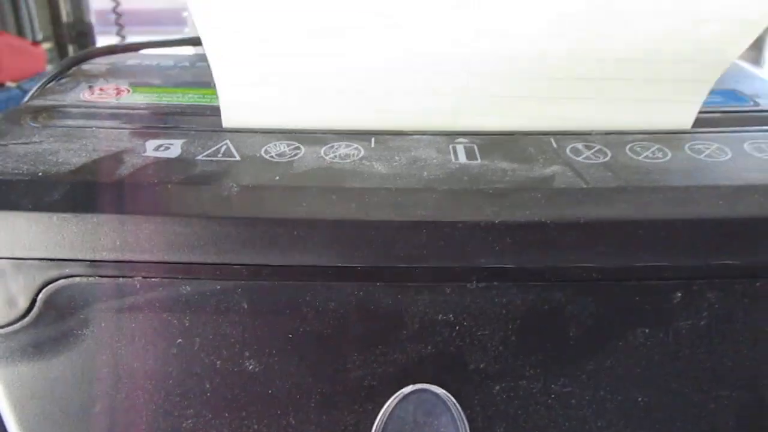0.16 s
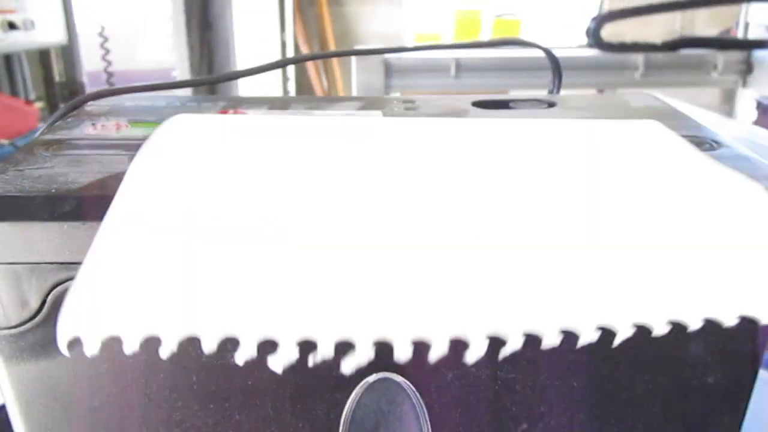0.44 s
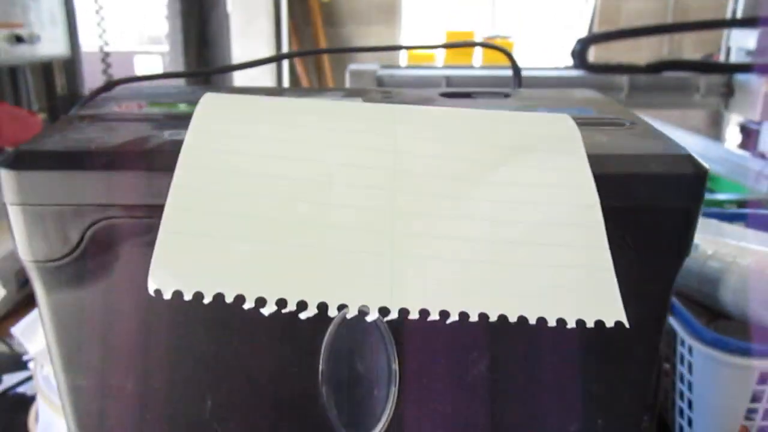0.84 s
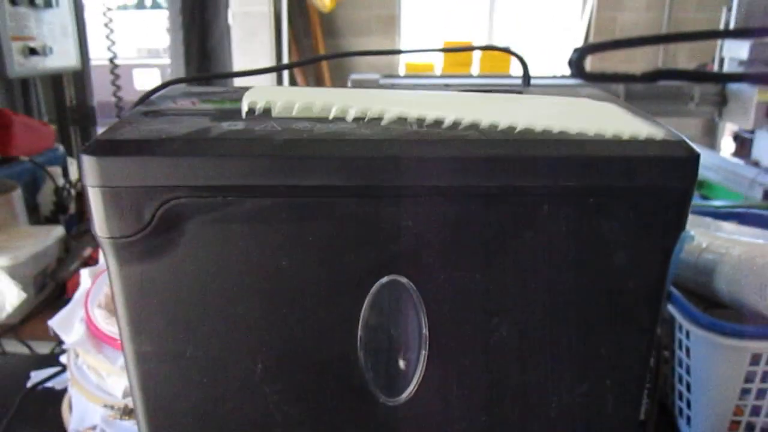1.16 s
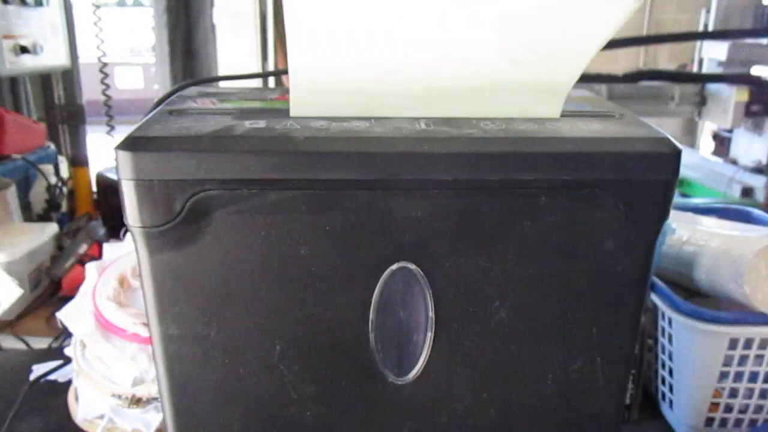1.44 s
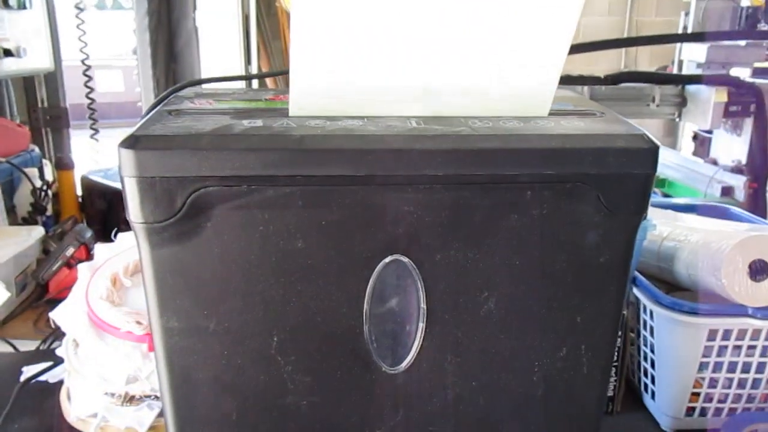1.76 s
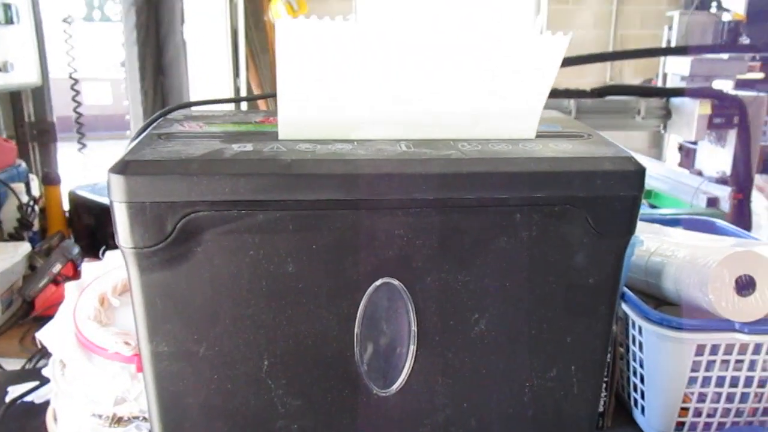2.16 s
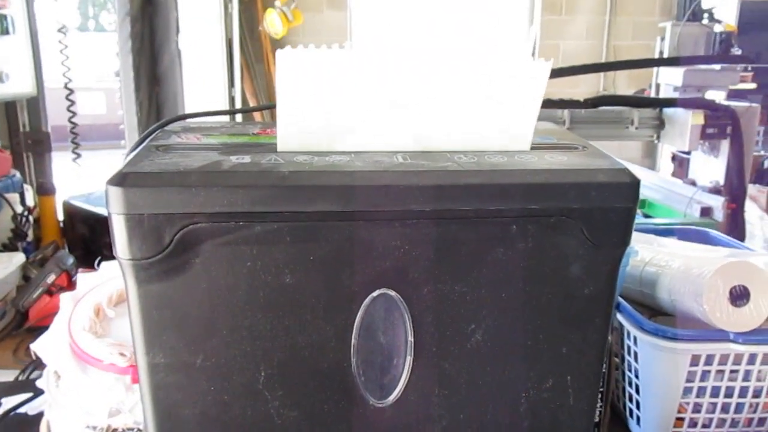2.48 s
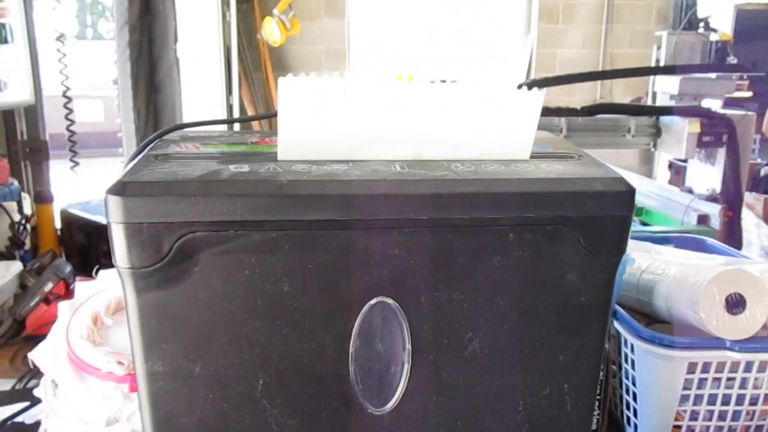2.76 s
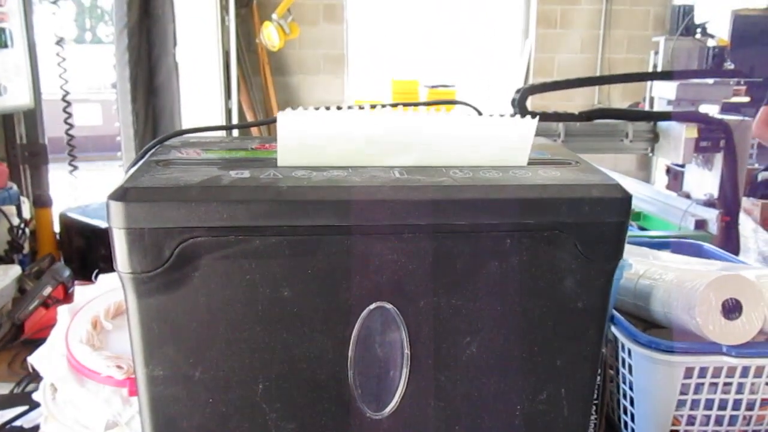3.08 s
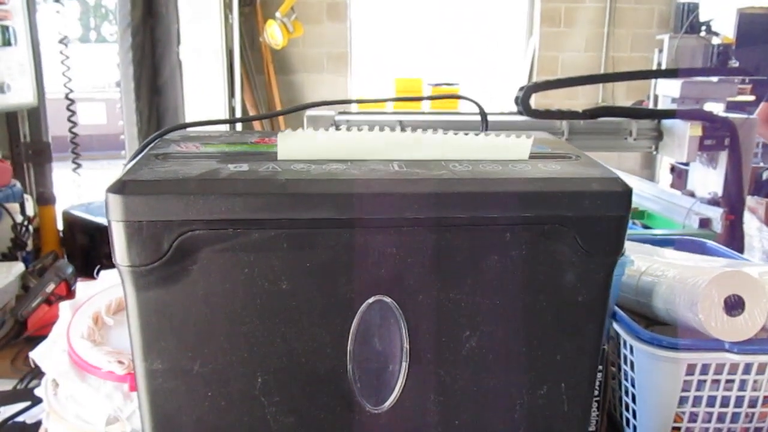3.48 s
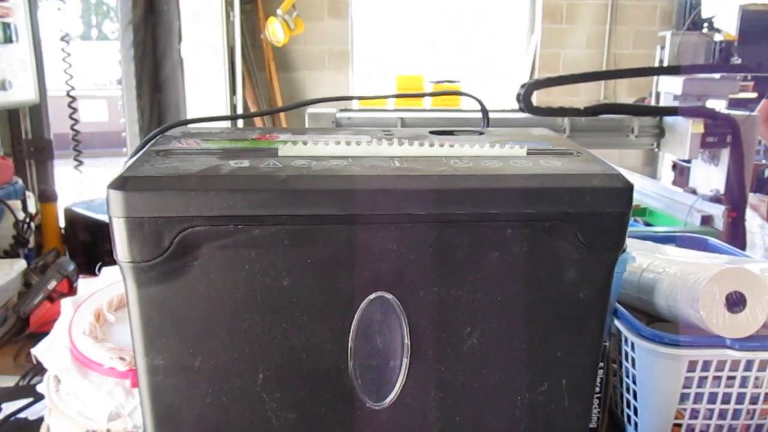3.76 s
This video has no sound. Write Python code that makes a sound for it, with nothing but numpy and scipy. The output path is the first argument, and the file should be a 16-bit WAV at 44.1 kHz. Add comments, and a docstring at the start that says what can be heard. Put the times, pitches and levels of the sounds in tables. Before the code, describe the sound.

A small paper shredder hums and whines while crackling through a sheet of paper.

```python
"""A small paper shredder pulls in a sheet, miked close: first over the lid, then from the front.
Its mains-fed motor hums, the pinion whines, the gears grind and the shaken plastic bin rumbles.
The cutters crackle and snap through the fibres; the sheet buckles with dull pops and knocks the lid.
Twice the treble drops out for an instant."""
import sys
import numpy as np
from scipy import signal
from scipy.fft import rfft, irfft, next_fast_len
from scipy.io import wavfile
from scipy.ndimage import uniform_filter1d, map_coordinates

SR = 44100
rng = np.random.default_rng(int(sys.argv[2]) if len(sys.argv) > 2 else 0)


def digitize_waveform(pressure):
    """Quantize a signal to 16-bit integers and store it at the path in sys.argv[1].

    Rows of a 2-D input are taken as channels; values are limited to [-1, 1].
    """
    field = np.atleast_2d(pressure).T
    bounded = np.clip(field, -1, 1)
    quanta = np.round(bounded * 32767).astype(np.int16)
    wavfile.write(sys.argv[1], SR, quanta)


N = 172872

# microphone position (t/s, 0 over the lid to 1 in front)
MIC_POSITION = [(0, 0), (.6, 0), (1.05, 0.1), (1.3, 0.7), (2.1, 1), (3.92, 0.9)]
# swell of the motor's hum, squeal and whirr (t/s, gain/dB)
MOTOR_SWELL = [(0, 0), (.4, -2.5), (.75, 3), (1.1, -1.5), (1.7, -6), (2.1, -4.5), (2.6, -1), (3.1, -1),
               (3.45, 3), (3.92, 3)]
# crackle of the paper in the cutters (t/s, level/dB)
CRACKLE_LEVEL = [(0, -30.5), (.12, -33), (.35, -28.5), (.55, -32), (.8, -32.5), (1.05, -32), (1.36, -29),
                 (1.7, -34.5), (2.1, -31), (2.7, -32.5), (2.9, -28), (3.1, -31.5), (3.55, -30), (3.75, -32),
                 (3.92, -29.5)]


def amp(db):
    """Decibels to gain."""
    return 10 ** (np.asarray(db) / 20)


def unit(x):
    """Scale to rms 1."""
    return x / np.sqrt(np.mean(x ** 2) + 1e-20)


def curve(rows):
    """Join (t/s, value) points, one value per sample."""
    return np.interp(np.arange(N) / SR, *np.transpose(rows))


def wobble(rate):
    """A smooth random curve, rate knots a second."""
    grid = np.arange(0, N + 32, 32)
    knots = rng.standard_normal(int(N * rate / SR) + 4)
    return np.interp(np.arange(N), grid, map_coordinates(knots, [grid * rate / SR]))


def filtered(x, response):
    """Filter x by a gain given as a function of frequency."""
    size = next_fast_len(len(x) + 8192)
    return irfft(rfft(x, size) * response(np.fft.rfftfreq(size, 1 / SR)), size)[:len(x)]


def coloured(x, points):
    """Equalise x through (f/Hz, gain/dB) points on a log axis."""
    f, db = np.transpose(points)
    return filtered(x, lambda hz: amp(np.interp(np.log(hz + 1), np.log(f), db)))


def noise(points):
    """Coloured noise of rms 1."""
    return unit(coloured(rng.standard_normal(N), points))


def resonance(centre_hz, half_width_hz):
    """A noise-driven resonance of rms 1."""
    white = rng.standard_normal(N)
    return unit(filtered(white, lambda hz: 1 / (1 + ((hz - centre_hz) / half_width_hz) ** 2)))


def tone(cycles, waver_db, drift_rad):
    """A sine of rms about 1, unsteady in level and phase."""
    level = np.sqrt(2) * amp(waver_db * wobble(14))
    return level * np.sin(2 * np.pi * (cycles + rng.random()) + drift_rad * wobble(12))


def burst(envelope, centre_hz, octaves, click=0):
    """A short crack of peak 1: a band of shaped noise, with or without a leading click."""
    impact = click + envelope * rng.standard_normal(len(envelope))
    crack = filtered(impact, lambda hz: np.exp(-.5 * (np.log2((hz + 1) / centre_hz) / octaves) ** 2))
    return crack / np.abs(crack).max()


def motor(turns, front):
    """Shaft and gears hum; from the front a thin, high squeal joins them."""
    # shaft and gear tones (multiple of the motor speed, level over the lid/dB, level in front/dB)
    gear_tones = [(1, -48.5, -39.3), (1.264, -48.6, -42), (1.587, -38.8, -35.3), (2, -40.5, -39.5),
                  (2.174, -44, -49), (2.264, -44.9, -44), (2.47, -45.5, -42.8), (2.736, -45.9, -37.5),
                  (4, -34.7, -42.4), (4.736, -48.5, -40.5), (5, -39, -38.5), (5.736, -41, -42.8),
                  (6, -43.7, -35.8), (6.44, -47.5, -40.5), (7, -42.9, -40.1), (9, -51.9, -41.0),
                  (12, -43.6, -50.2), (13, -46.1, -46.7), (15, -50.3, -43.7)]
    # the motor's high ring (f/Hz, half-width/Hz, level/dB)
    squeal_band = (6818, 31, -50.5)
    cutter_turn_s, load_peak_s = 1.003, 1.2  # the load peaks once per turn of the cutters
    load_db = 3.5 * np.cos(2 * np.pi * (np.arange(N) / SR - load_peak_s) / cutter_turn_s)
    hum = 0
    for multiple, lid_db, front_db in gear_tones:
        db = lid_db + front * (front_db - lid_db) + 1.56 * wobble(2.53)
        db += (multiple < 2) * load_db  # only the lowest tones swell with the load
        hum += amp(db) * tone(multiple * turns, waver_db=1.0, drift_rad=0.071)
    squeal_hz, half_width_hz, squeal_db = squeal_band
    squeal = amp(squeal_db) * front * resonance(squeal_hz, half_width_hz)
    return amp(curve(MOTOR_SWELL)) * (hum + squeal)


def pinion(turns, mains, teeth=8):
    """The pinion whines at its tooth rate, pulsing with the mains."""
    # the whine (t/s, level/dB)
    whine_level = [(0, -37), (.15, -33.5), (.35, -27.5), (.8, -25), (1.08, -30.5), (1.2, -26.5),
                   (1.5, -30.5), (1.78, -32.5), (2.02, -31), (2.22, -27.5), (2.38, -29), (2.8, -25),
                   (3.2, -23), (3.55, -21.5), (3.92, -23)]
    # its partials (offset from the tooth rate in multiples of the mains pulse rate, gain/dB)
    sidebands = [(-1, -16), (0, 0), (1, -7)]
    mesh = teeth * turns + 0.025 * wobble(40)
    whine = sum(amp(db) * np.sin(2 * np.pi * (mesh + k * mains) + k * k * np.pi / 2)
                for k, db in sidebands)
    return np.sqrt(2) * amp(curve(whine_level) + 0.36 * wobble(13)) * whine


def whirr(turns, front, flutter_hz=40):
    """The third shaft tone and its sidebands run in step and flutter in quick falling sweeps."""
    # (offset in multiples of the flutter rate, level over the lid/dB, level in front/dB)
    sidebands = [(0, -34, -30.5), (1, -40.5, -33), (2, -41.5, -37), (3, -33.5, -35)]
    flutter = flutter_hz * np.arange(N) / SR + 0.036 * wobble(6)
    carrier = 3 * turns + 0.04 * wobble(12)
    partials = 0
    for k, lid_db, front_db in sidebands:
        db = lid_db + front * (front_db - lid_db) + 1.3 * wobble(9.01)
        sweep_phase = np.pi * (k / 2) ** 2
        partials += amp(db) * np.sin(2 * np.pi * (carrier + k * flutter) + sweep_phase)
    return np.sqrt(2) * amp(curve(MOTOR_SWELL)) * partials


def gears(turns, mains, front):
    """The gears grind low down, under a rasp chopped by the shaft and the mains."""
    # rasp of gears and cutters, miked over the lid (f/Hz, level/dB)
    lid_spectrum = [(700, -30), (1500, -2), (2150, 1), (2350, 1), (2650, 0.5), (3500, 3), (4600, -7),
                    (6300, -9), (7600, -15.5), (10000, -21), (15000, -34)]
    # the rasp from the front (f/Hz, level/dB)
    front_spectrum = [(700, -29), (1500, -23), (1850, -11.5), (2150, -2), (2350, -4), (2520, -0.5),
                      (3300, 0.5), (4300, -7.5), (5400, -18), (6850, -9.5), (7600, -17), (8300, -12),
                      (8750, -17.5), (9100, -14.5), (11000, -21.5), (15000, -32)]
    # course of the rasp (t/s, level/dB)
    rasp_level = [(0, -24), (.11, -28), (.25, -24.5), (.35, -23.5), (.4, -29.5), (.55, -24), (.85, -26.5),
                  (1.05, -26.5), (1.25, -28.5), (1.5, -30), (1.8, -30), (2.2, -29), (2.9, -25.5),
                  (3.4, -26), (3.92, -25.5)]
    # colour of the grinding (f/Hz, level/dB)
    grind_spectrum = [(200, -24), (470, -12.5), (610, -5.5), (750, -1), (950, -2.7), (1150, -5), (1420, 2),
                      (1650, -8.5), (2200, -16), (5000, -58)]
    # course of the grinding (t/s, level/dB)
    grind_level = [(0, -31.5), (.45, -29), (.85, -29.5), (1.08, -32.5), (1.23, -28.5), (1.45, -32),
                   (1.75, -33), (2.3, -30.5), (2.9, -28), (3.4, -29), (3.92, -27.5)]
    chop = (1 + .22 * np.cos(2 * np.pi * turns)) * (1 + .13 * np.cos(2 * np.pi * mains))
    scrape = np.sqrt(1 - front) * noise(lid_spectrum) + np.sqrt(front) * noise(front_spectrum)
    rasp = unit(scrape * chop * amp(2.0 * wobble(90)))
    grind = unit(noise(grind_spectrum) * amp(1.16 * wobble(70)))
    return amp(curve(rasp_level)) * rasp + amp(curve(grind_level)) * grind


def cutting(fibres_per_s=2600, spread_db=3, clump_db=3):
    """Paper fibres break in clumps between the cutters."""
    # colour of the crackle (f/Hz, level/dB)
    paper_spectrum = [(600, -30), (2000, -3), (4000, 5.5), (6500, 1.5), (7500, -4.5), (8400, -4),
                      (10500, -9.5), (12000, -12.5), (15000, -17.5)]
    breaks = rng.random(N) < fibres_per_s / SR
    sizes = amp(spread_db * np.clip(rng.standard_normal(N), -2, 2)) * rng.choice([-1, 1], N)
    clumps = amp(clump_db * wobble(140))
    crackle = unit(coloured(breaks * sizes * clumps, paper_spectrum))
    return amp(curve(CRACKLE_LEVEL)) * crackle


def tears(per_s=110, decay_s=0.00014, centre_hz=5200):
    """Small tears tick at random moments, each with its own size and colour."""
    out, t = np.zeros(N + SR), np.arange(SR // 100) / SR
    envelope = (1 - np.exp(-t / decay_s)) * np.exp(-t / decay_s)
    starts = np.flatnonzero(rng.random(N) < per_s / SR)
    scatter = np.clip(rng.standard_normal((len(starts), 2)), -2, 2)
    for start, (size, colour) in zip(starts, scatter):
        tick = burst(envelope, centre_hz * 2 ** (0.42 * colour), octaves=0.45)
        out[start:start + len(t)] += amp(10.5 + 3.5 * size) * tick
    return amp(curve(CRACKLE_LEVEL)) * out[:N]


def housing(x, ring_db=-10.5, decay_s=0.0057):
    """The plastic housing adds a short, dense ring to the sounds inside it."""
    t = np.arange(SR // 25) / SR
    ring = rng.standard_normal(len(t)) * np.exp(-t / decay_s) * (t > .001)
    return x + amp(ring_db) * signal.fftconvolve(x, ring / np.linalg.norm(ring))[:N]


def waste_bin(drone_hz=164.5):
    """The shaken plastic bin rumbles and sounds its low notes; one more note comes and goes."""
    # low notes of the bin (f/Hz, level against the rumble/dB)
    bin_modes = [(70, -11.5), (125, -19), (146, -23), (190, -14.5), (222, -15)]
    # colour of the rumble (f/Hz, level/dB)
    rumble_spectrum = [(20, -16), (45, -13), (90, -11), (130, -6.5), (180, -1.5), (280, 2), (450, -8.5),
                       (800, -2.5), (2000, -72)]
    # course of the rumble (t/s, level/dB)
    rumble_level = [(0, -43), (.55, -41), (1.25, -41), (1.6, -41.5), (2.3, -38), (2.9, -34.5), (3.4, -33),
                    (3.92, -34)]
    # the note that comes and goes (t/s, level/dB)
    drone_level = [(0, -46), (.36, -51), (.52, -68), (.72, -44.5), (1.05, -53), (1.7, -48.5), (2.2, -46),
                   (3.55, -48), (3.75, -37), (3.92, -34)]
    t = np.arange(N) / SR
    notes = sum(amp(db) * tone(hz * t, waver_db=5.5, drift_rad=0.32) for hz, db in bin_modes)
    rumble = noise(rumble_spectrum) + notes
    drone = tone(drone_hz * t, waver_db=3.0, drift_rad=0.22)
    return amp(curve(rumble_level)) * rumble + amp(curve(drone_level)) * drone


def feed_slot(fade_s=0.12):
    """The feed slot rings, heard only in the first instant, from right above it."""
    # resonances of the slot (f/Hz, half-width/Hz, level/dB)
    slot_modes = [(702, 35, -29.5), (2200, 110, -29.5)]
    ring = sum(amp(db) * resonance(hz, half_width) for hz, half_width, db in slot_modes)
    return ring * np.exp(-(np.arange(N) / SR / fade_s) ** 2)


def snaps(splinter_s=.00055, tail_s=.002, lid_hz=4300, front_hz=5300):
    """The paper snaps: one sharp break, a short splintering, a faint tail; brighter from the front."""
    # snaps in the cutters (t/s, level/dB)
    snap_events = [(0.0097, -9), (0.0485, -17), (0.0577, -9), (0.0796, -13), (0.1367, -13), (0.1862, -7),
                   (0.255, -18), (0.2702, -14), (.2763, -16), (.2802, -10), (0.3225, -11), (.3386, -7),
                   (0.3422, -14), (0.3484, -11), (0.353, -14), (0.368, -4.5), (0.4058, -8), (.4353, -10),
                   (.451, -5.5), (.4552, -15), (.4885, -11), (.5187, -10.5), (0.5923, -10.5), (.6724, -8.5),
                   (0.7044, -10), (0.7565, -10), (.7963, -11), (1.3413, -11), (1.3778, -3), (1.4708, -10.5),
                   (1.7786, -12), (1.827, -9.5), (2.0937, -10), (2.2164, -11), (2.2486, -11), (2.5002, -14),
                   (2.5381, -9.5), (2.7245, -16), (2.752, -15), (2.8456, -10), (2.85, -19), (2.8878, -8),
                   (2.8949, -12), (2.905, -5), (2.9104, -14), (2.9313, -10), (2.9527, -13), (2.9845, -11),
                   (3.0164, -10.5), (3.0249, -18), (3.1315, -12), (3.2745, -12), (3.4644, -11),
                   (3.512, -15), (3.5176, -9), (3.553, -7.5), (3.5973, -8), (3.599, -12), (3.6102, -10),
                   (3.8666, -6.5)]
    out, lead = np.zeros(N + SR), 64  # samples of room ahead of each break
    t = (np.arange(SR // 25) - lead) / SR
    age = np.abs(t)
    splinters = (t > 0) * (amp(-9) * np.exp(-age / splinter_s) + amp(-22) * np.exp(-age / tail_s))
    for s, db in snap_events:
        front = np.interp(s, *np.transpose(MIC_POSITION))
        hz = (lid_hz + front * (front_hz - lid_hz)) * 2 ** (.1 * rng.standard_normal())
        snap = burst(splinters, hz, octaves=1.08, click=t == 0)
        out[max(round(s * SR) - lead, 0):][:len(t)] += amp(db + 1) * snap
    return out[:N]


def pops():
    """The sheet buckles with duller pops."""
    # buckles (t/s, peak level/dB, centre f/Hz, decay/s, width/octaves)
    pop_events = [(.056, -9, 2900, .0012, 0.8), (0.131, -6.5, 2600, .001, 0.6),
                  (.233, -10, 3270, .012, 0.37), (.279, -4, 3120, 0.0008, 0.66),
                  (.3215, -7.5, 3600, .0015, 0.57), (0.488, -9, 3600, .001, 0.62),
                  (0.839, -4.5, 2920, 0.0017, 0.83), (1.192, -8.5, 1900, 0.0024, 0.48),
                  (1.2365, -7.5, 1500, 0.003, 1.43), (1.611, -6, 3920, 0.00035, 0.51)]
    out, lead = np.zeros(N + SR), 64
    t = (np.arange(SR // 25) - lead) / SR
    for s, db, hz, decay_s, octaves in pop_events:
        envelope = (t >= 0) * np.exp(-np.abs(t) / decay_s)
        out[round(s * SR) - lead:][:len(t)] += amp(db) * burst(envelope, hz, octaves)
    return out[:N]


def lid_knocks(attack_s=0.00054):
    """The sheet knocks the lid, which rings briefly."""
    # knocks (t/s, level/dB)
    knock_events = [(.821, -18), (.8375, -16.5), (1.1925, -14.5), (1.236, -11.5), (1.777, -18)]
    # modes of the lid (f/Hz, gain/dB, t60/s)
    lid_modes = [(772, 2, 0.021), (1320, -3, 0.016)]
    out, t = np.zeros(N + SR), np.arange(SR // 20) / SR
    ring = sum(amp(db - 60 * t / t60) * np.sin(2 * np.pi * hz * t) for hz, db, t60 in lid_modes)
    ring *= 1 - np.exp(-t / attack_s)
    for s, db in knock_events:
        out[round(s * SR):][:len(t)] += amp(db) * ring
    return out[:N]


def scene():
    """One motor drives the shredder; one close microphone moves from the lid to the front."""
    # speed of the motor (t/s, turns per second)
    motor_speed = [(0.0, 451.3), (0.14, 451.5), (0.35, 454.1), (0.55, 454.7), (0.95, 454.9), (1.12, 453.3),
                   (1.28, 452.9), (1.42, 455.3), (1.62, 455.1), (1.98, 454.5), (2.2, 452.7), (2.45, 454.0),
                   (2.72, 455.6), (3.0, 455.0), (3.3, 454.9), (3.65, 456.5), (3.84, 458.1), (3.92, 458.0)]
    turns = np.cumsum(curve(motor_speed)) / SR
    mains = 120 * np.arange(N) / SR  # 120 torque pulses a second
    front = curve(MIC_POSITION)
    drive = motor(turns, front) + pinion(turns, mains) + whirr(turns, front)
    inside = housing(gears(turns, mains, front) + cutting() + tears())
    return (drive + inside + waste_bin() + feed_slot() + snaps() + pops() + lid_knocks())[None]


def record(dry):
    """The treble drops out twice; nothing passes above the band limit."""
    # treble dropouts (start t/s, end t/s)
    dropouts = [(1.1194, 1.1458), (1.6787, 1.7057)]
    # colour during a dropout (f/Hz, gain/dB)
    dropout_colour = [(1000, 1), (1650, -8), (2050, -13), (3700, -24.5), (6300, -17.5), (8000, -9),
                      (10000, -2)]
    t, top_hz = np.arange(N) / SR, 15200
    gate = sum(1. * ((t > start) & (t < end)) for start, end in dropouts)
    gap = uniform_filter1d(gate, size=24)  # soften the edges
    mono = (1 - gap) * dry[0] + gap * coloured(dry[0], dropout_colour)
    return filtered(mono, lambda hz: hz < top_hz)[None]


dry = scene()
out = record(dry)
digitize_waveform(out)
```